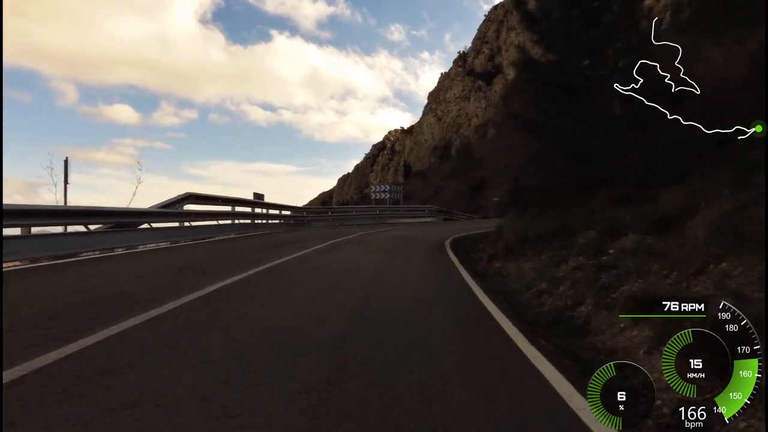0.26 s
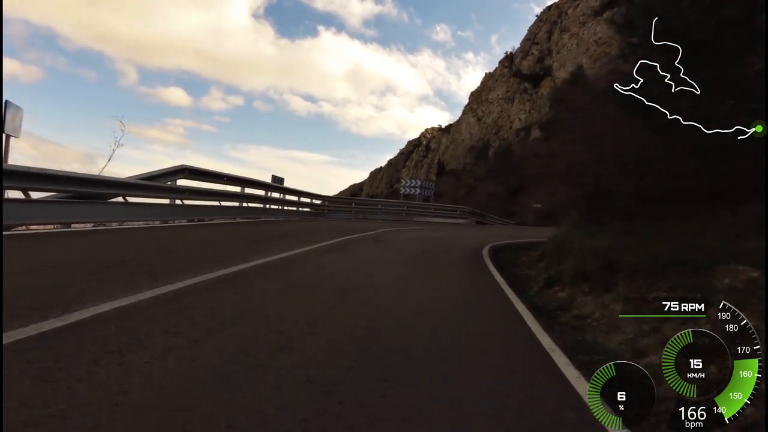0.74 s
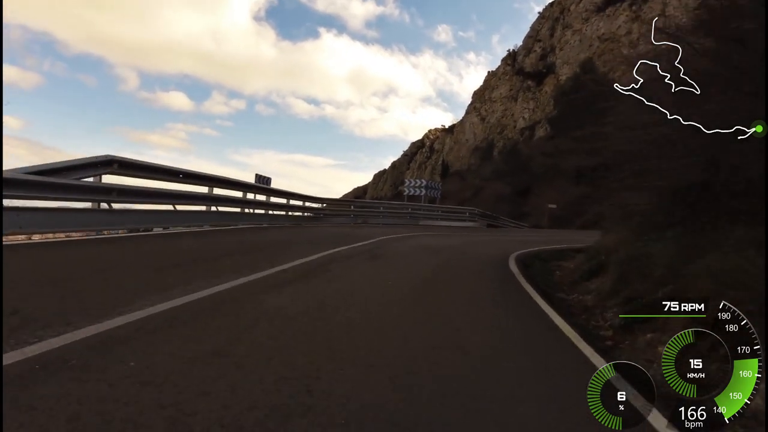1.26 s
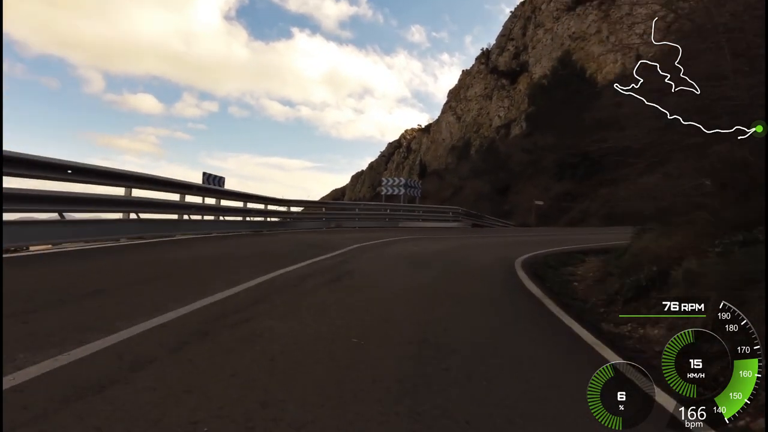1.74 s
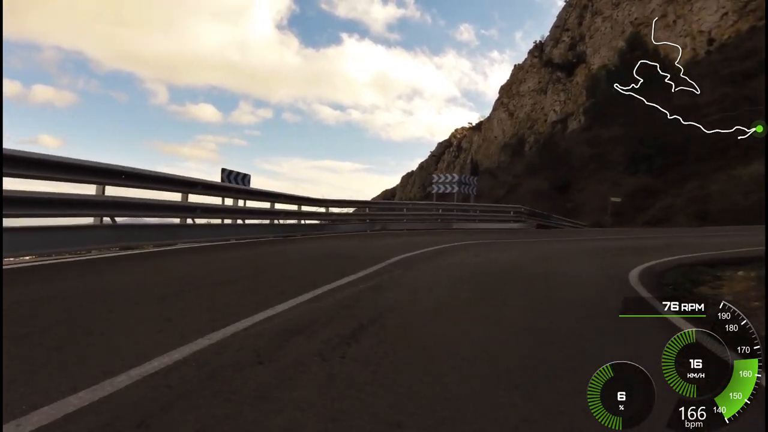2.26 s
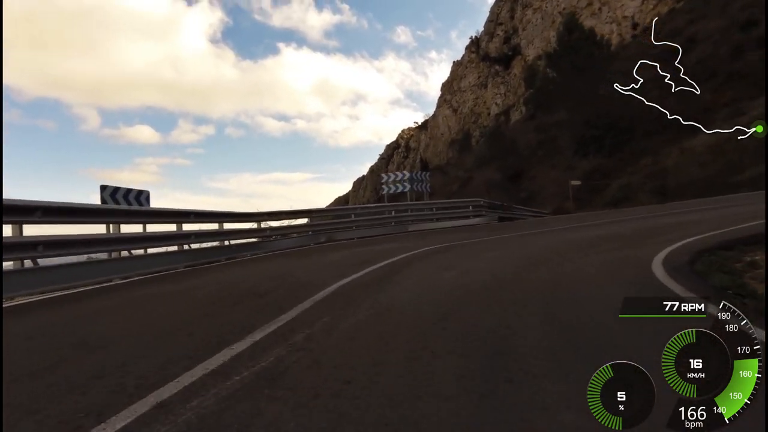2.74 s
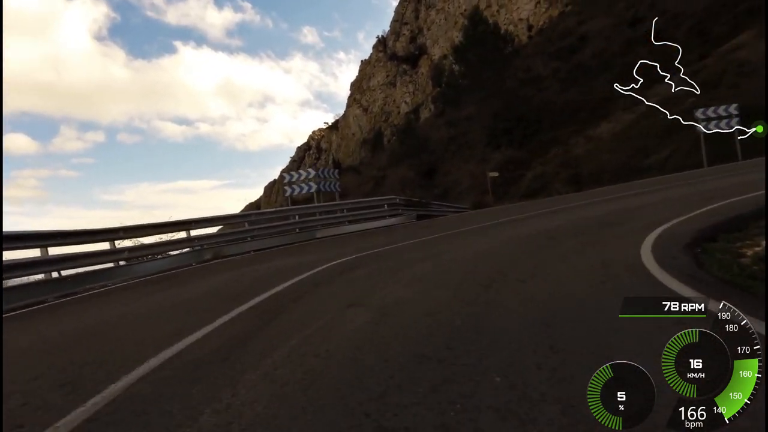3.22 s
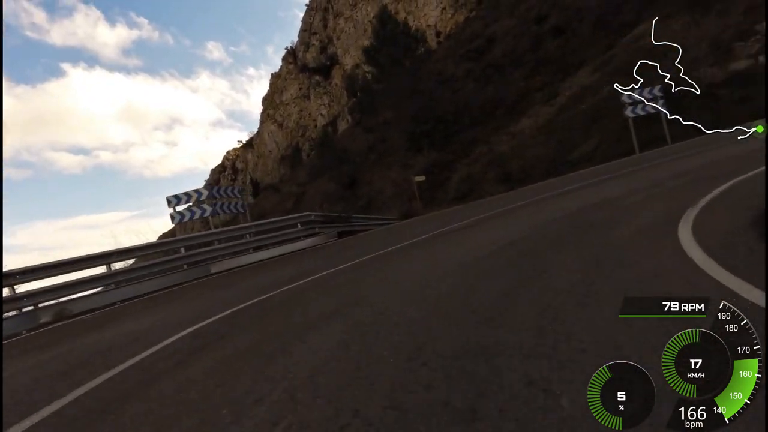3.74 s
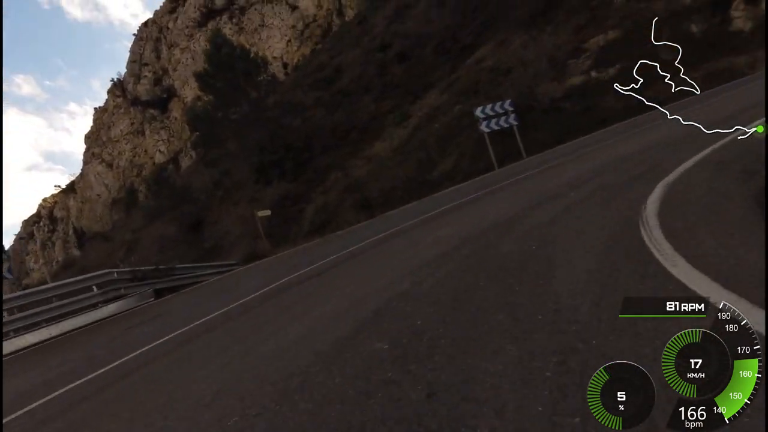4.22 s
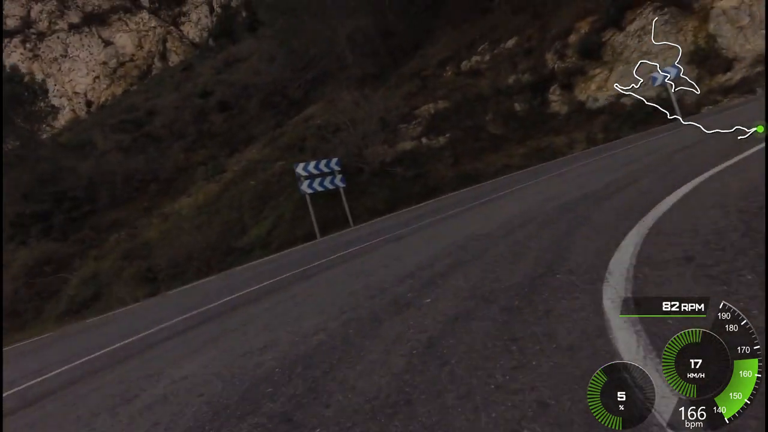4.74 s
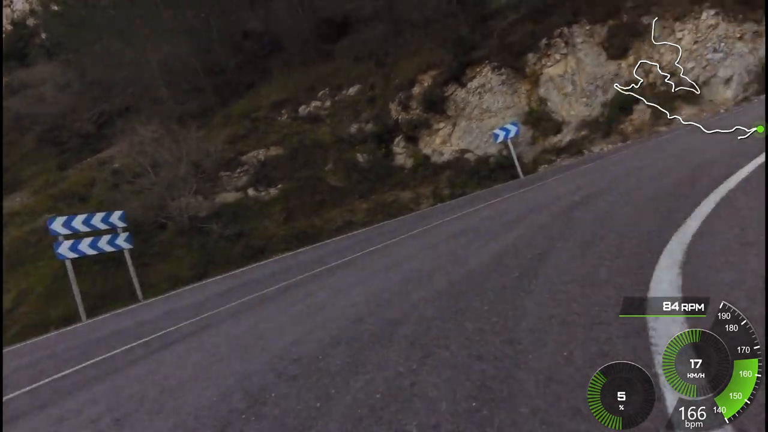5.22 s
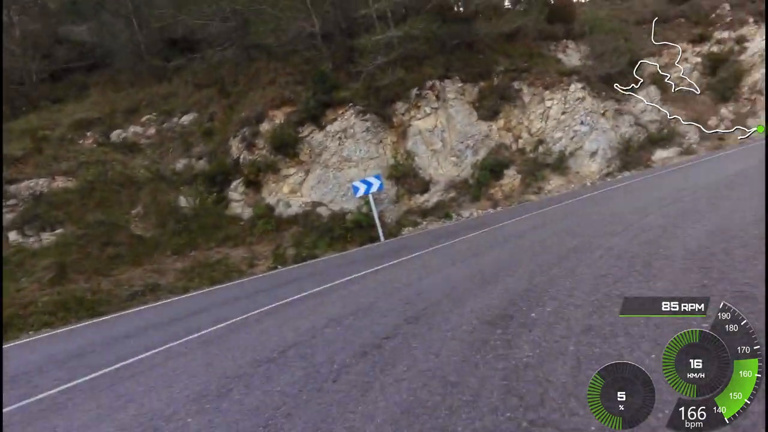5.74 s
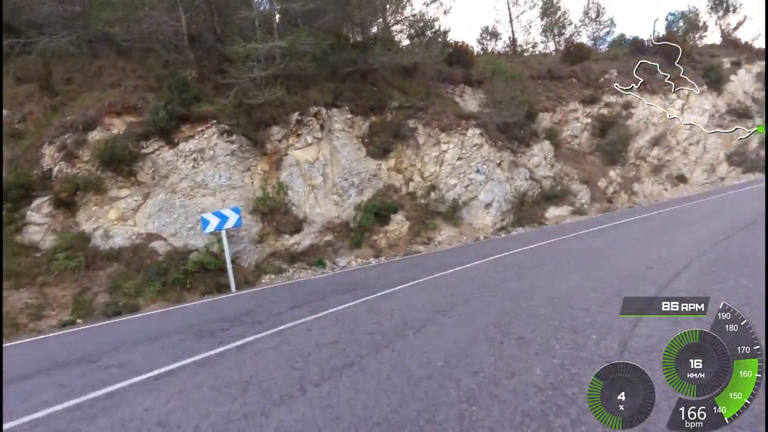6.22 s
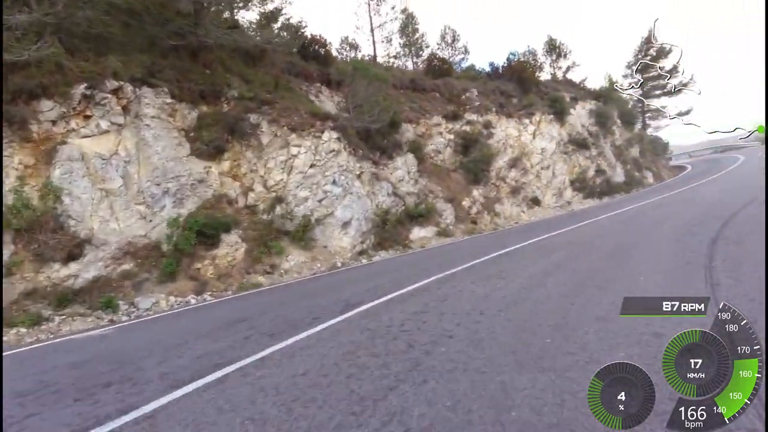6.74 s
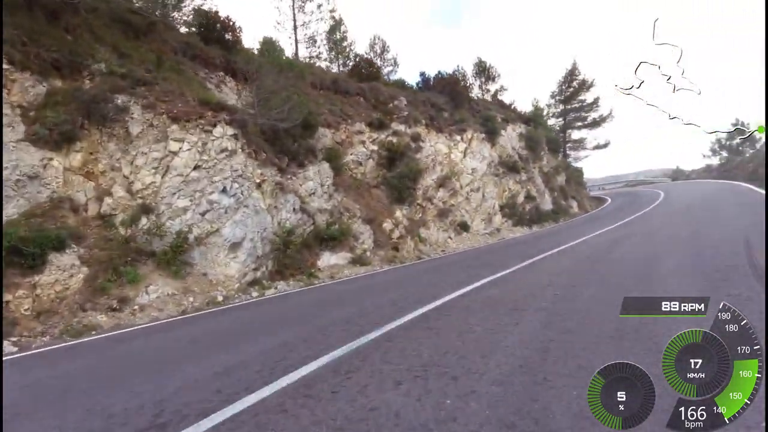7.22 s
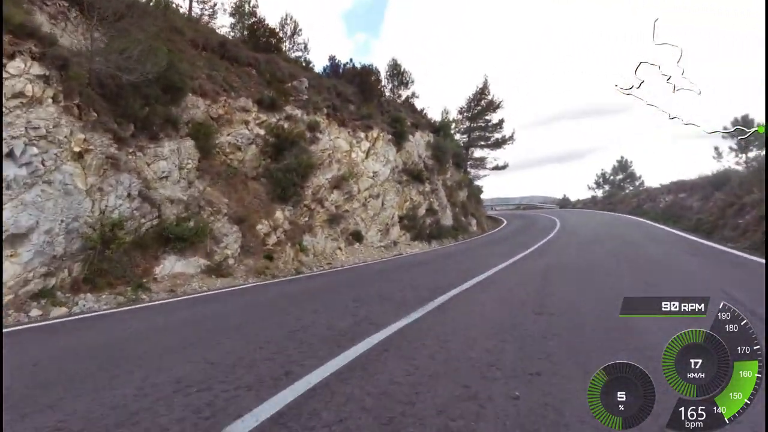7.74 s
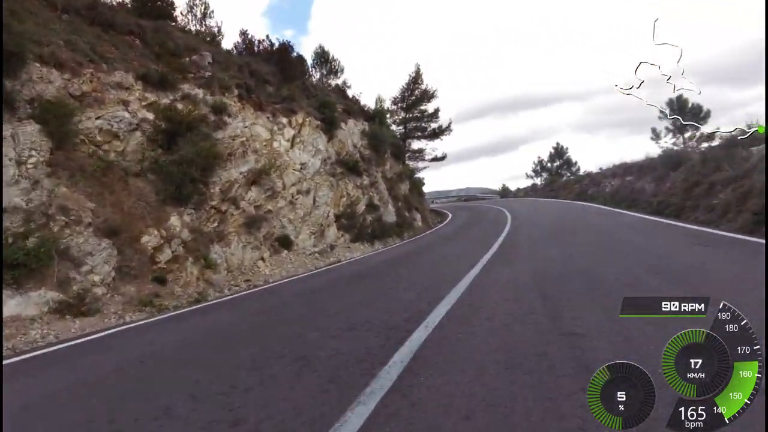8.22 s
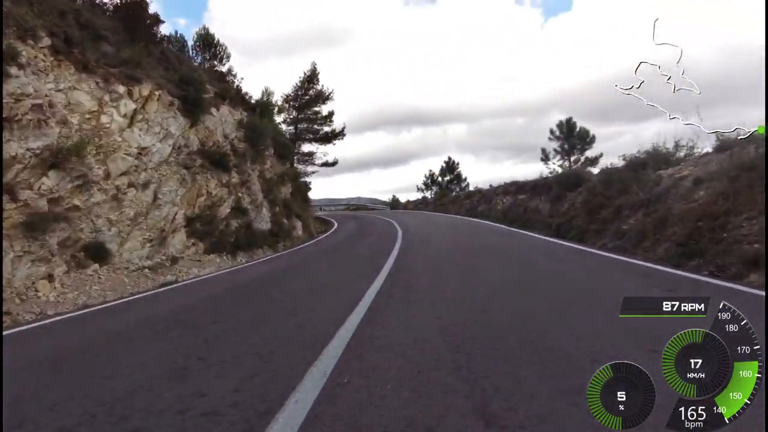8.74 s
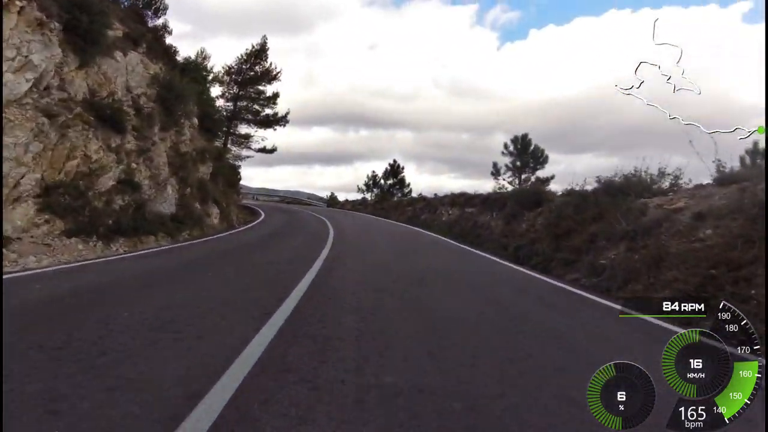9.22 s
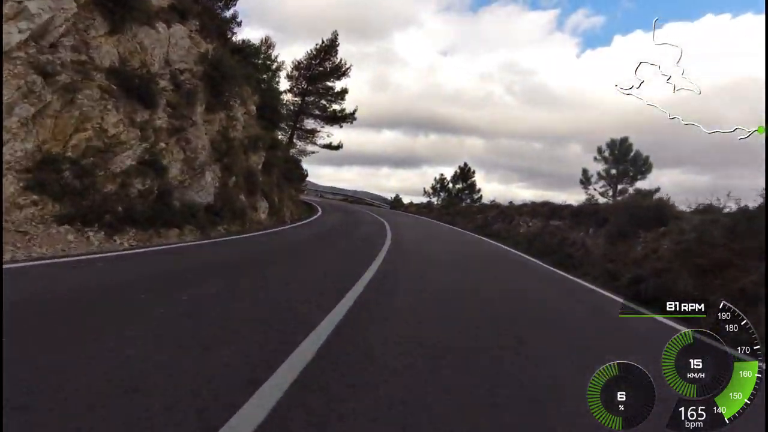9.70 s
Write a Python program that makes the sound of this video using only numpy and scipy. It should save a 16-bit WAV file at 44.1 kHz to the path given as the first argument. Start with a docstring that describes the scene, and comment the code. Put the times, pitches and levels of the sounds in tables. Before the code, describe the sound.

A camera in a plastic housing, mounted on a bicycle, rides up an asphalt road. Dense irregular hard knocks, each a short dry tick with a dull thud, tumble over a loose fluttering rattle. Low shaking, muffled rolling noise and a faint hollow hum swell around them. Later the thuds get heavier and some clip. Very close, mono, dull on top, without echo.

```python
"""Hard plastic knocks over a loose rattle, low shaking, rolling noise and a faint hum, some knocks overloading.
A camera in a plastic housing rides on a bicycle up an asphalt road. Knocks are short contacts ringing
the housing modes plus a dead thud; the rattle is many small knocks, half of them keeping a 73 Hz beat.
Shake, rolling noise and hum are filtered noise, grit is dense tiny contacts; all swell around the knocks."""
import sys
import numpy as np
from scipy import signal
from scipy.fft import rfft, irfft
from scipy.io import wavfile
from scipy.ndimage import uniform_filter1d

SR = 44100
rng = np.random.default_rng(int(sys.argv[2]) if len(sys.argv) > 2 else 0)


def bounce(signal):
    """Save signal as a 16-bit WAV file at the path given by the first command-line argument."""
    frames = np.transpose(np.atleast_2d(signal))
    limited = np.clip(frames, -1, 1)
    pcm = np.round(limited * 32767).astype(np.int16)
    wavfile.write(sys.argv[1], SR, pcm)


N = 439676

# the loudest knocks, nominal levels:
# (time [s], tick level [dB], thud level [dB], hardness as treble relative to the tick [dB])
CLEAR_KNOCKS = [(0.0387, -15.5, -14, -27), (0.0807, -13.5, -15, -21), (0.1059, -15, -3, -15),
                (0.2229, -13, -7.5, -10.5), (0.2373, -16, -7, -11), (0.349, -14, -17.5, -24),
                (0.357, -9, 0, -30), (0.4024, -9, -1, -20), (0.512, -10.5, -9.5, -26),
                (0.558, -18, -13, -32), (0.604, -12.5, -8, -33), (0.617, -11.5, -14, -25),
                (0.624, -18.5, -1.5, -24), (0.687, -22, -20, -4), (0.6993, -13.5, -8, -8.5),
                (0.7092, -11, 1.5, -13), (0.727, -13, -8, -16), (0.7525, -15, -8, -12),
                (0.769, -13, -12, -18), (0.857, -15.5, -12.5, -20), (0.8659, -17, 1.5, -6.5),
                (0.927, -19.5, -13.5, -5.5), (0.9395, -18.5, -14, -31), (1.0375, -13, -0.5, -17),
                (1.0699, -8, -27, -21), (1.101, -9, -0.5, -23), (1.1085, -20, -1.5, -18),
                (1.151, -11, -11, -15), (1.1615, -13, -1.5, -13), (1.1749, -19, -6, -8),
                (1.184, -19, -4.5, -11), (1.196, -16, -13, -20), (1.2044, -32, -1.5, 3),
                (1.229, -17, -8, -15), (1.3321, -13.5, -9, -17), (1.3457, -11, -7.5, -16.5),
                (1.4258, -15, -4.5, -31), (1.4676, -34, -5.5, -27), (1.506, -12, -5.5, -27),
                (1.5193, -6.5, -6, -9.5), (1.526, -20.5, -13.5, -1), (1.5527, -10, -7, -20),
                (1.566, -10.5, -1.5, -8), (1.579, -10.5, -12, -21), (1.5893, -10.5, -5, -28),
                (1.647, -12.5, -10, -29), (1.674, -16, -14, -28), (1.693, -12.5, -17, -27),
                (1.7073, -15.5, -10, -9.5), (1.7227, -13, -20, -29), (1.7525, -14.5, -14, -21),
                (1.7943, -12, -10, -21), (1.809, -16.5, -8.5, -16), (1.827, -11.5, -11, -22),
                (1.8805, -14.5, -10.5, -33), (1.8971, -10, -13, -38), (1.9214, -30, -1, 3),
                (1.991, -13.5, -13, -40), (2.0019, -14, -20, -27), (2.032, -12.5, -13, -15),
                (2.0454, -11.5, -6.5, -12.5), (2.0763, -18.5, -12, -35), (2.1207, -18, -13, -33),
                (2.1379, -11, -7, -30), (2.1499, -12.5, -13, -10), (2.1637, -15, -8, -27),
                (2.1875, -11, -9, -25), (2.194, -8.5, -3.5, -16), (2.214, -14, -10, -15),
                (2.2325, -12.5, -20, -25), (2.241, -16.5, -7, -22), (2.277, -14.5, -15, -16),
                (2.3381, -10.5, -9, -16), (2.3688, -14, -14, -39), (2.4575, -9, -4, -12),
                (2.4717, -10, -3, -7), (2.5, -12, -13, -30), (2.5133, -10.5, -6, -13),
                (2.5267, -11, -8, -19), (2.543, -19, -11.5, -38), (2.5549, -12.5, -17, -16),
                (2.5612, -33, -7.5, -20), (2.5852, -21, -5, -16), (2.6194, -13.5, -13, -30),
                (2.6914, -9, -8.5, -19), (2.7062, -11.5, -3.5, -5.5), (2.7321, -13, -9, -12),
                (2.7615, -5, -5, -29), (2.7734, -17.5, -3, -7), (2.8016, -9.5, -8, -31),
                (2.8086, -10.5, -9, -19), (2.8237, -12.5, -10, -9), (2.8426, -11.5, -8.0, -18),
                (2.8551, -12, -10, -19), (2.8972, -14, -6.5, -20), (2.932, -10.5, -11, -17),
                (2.9444, -12, -5.5, -13.5), (3.0409, -13.5, -8.5, -39), (3.0897, -7, -5.5, -18),
                (3.1046, -11.5, -6.5, -10), (3.118, -9.5, -6.5, -12.5), (3.135, -9, -4, -12.5),
                (3.153, -18.5, -3, -18), (3.1592, -14, -9, -18), (3.1768, -9.0, -6, -28),
                (3.1895, -14.5, -9.5, -21), (3.2042, -10, -13, -26), (3.2698, -9.5, -8.5, -16.5),
                (3.3247, -9.5, -5, -23), (3.403, -10.5, -8, -31), (3.4164, -11.5, -5, -9.5),
                (3.431, -10.5, -5, -11), (3.5066, -13, -11, -17), (3.5326, -16.5, -11.5, -39),
                (3.5398, -12, -14, -20), (3.5831, -10.5, -13, -18), (3.595, -18.5, -5.5, -11),
                (3.607, -8.5, -4.5, -14.5), (3.724, -19, -0.5, -4), (3.7289, -12.5, -8, -13),
                (3.757, -10, -1.5, -26), (3.7634, -12, -15, -12.5), (3.8246, -14.5, -9, -18),
                (3.8451, -22.5, -14, -39), (3.868, -13.5, -8, -25), (3.8902, -12.5, -7, -17),
                (3.9174, -13, -11, -14), (3.95, -17, -16, -30), (3.9565, -10.5, -16, -21),
                (3.9675, -30, -7, -11), (3.999, -13.5, -21, -15), (4.054, -15, -15, -18),
                (4.076, -15.5, -18, -18), (4.1285, -17.5, -2, -9), (4.1823, -11, -16, -15),
                (4.202, -24.5, -17, -28), (4.241, -18.5, -0.5, -6), (4.2691, -17.5, 1.5, -11),
                (4.3197, -13, -13, -11), (4.4389, -11, -7.5, -16), (4.4483, -17, -11, -17),
                (4.4565, -13.5, -17, -20), (4.4753, -22, 0.5, -13), (4.486, -10, -12, -23),
                (4.517, -12, -11, -14), (4.5634, -9.5, -5.5, -7), (4.573, -11.5, 1.5, -11),
                (4.606, -18.5, 0.0, -5), (4.6155, -30, -4, -7), (4.6342, -7.5, 0.5, -7.5),
                (4.6581, -14, -1, -9), (4.6666, -14, 0, -18), (4.6792, -15.5, -4, -2),
                (4.6893, -16, -2, -11), (4.708, -20, -12, -25), (4.772, -22, -5, -9),
                (4.7852, -12, -13, -26), (4.8056, -21, -2.5, -9), (4.876, -8.5, -3.5, -24),
                (4.895, -11, -8, -16), (4.9086, -25, -6.5, -17), (4.9455, -22, 2.5, 0.5),
                (4.9565, -36, -6.5, -20), (4.981, -12, -8, -16), (5.046, -13.5, -12, -21),
                (5.0577, -26, -1, 3), (5.0718, -15, -6.5, -10), (5.085, -27, -1, 0), (5.1039, -42, -9, -25),
                (5.1357, -15, -21, -16.5), (5.205, -13, -13, -28), (5.2176, -10, -18, -13),
                (5.2461, -12.5, 0.5, -10), (5.27, -21, -2, -11), (5.3099, -15.5, 0.5, -7.5),
                (5.3176, -22, -1, -9), (5.325, -16, -4, -15), (5.3311, -13.5, -2, -12),
                (5.3458, -12.5, -7.5, -15), (5.3557, -17.5, -7.5, -12), (5.3829, -14.5, -2, -4.5),
                (5.4241, -18.5, 0, -5.5), (5.435, -32, -7.5, -17), (5.4675, -16, 0, -7),
                (5.479, -19, -9, -17), (5.497, -27, -5.5, -8), (5.5102, -28, -3.5, -8),
                (5.525, -14, -9.5, -11.5), (5.5624, -23, -6, -6), (5.5948, -38, -5.5, -29),
                (5.628, -29, -0.5, -4), (5.6489, -18.5, -4.5, -14), (5.6722, -18, -0.5, -10),
                (5.6886, -29, -6, -9), (5.713, -40, -6, -28), (5.7536, -15.5, -2.5, -10),
                (5.7815, -28, -5.5, -14), (5.8369, -21, -9.5, -18), (5.8829, -13.5, -21, -25),
                (5.8955, -12.5, -11, -13), (5.9087, -12.5, -14, -16), (5.9182, -16.5, -0.5, -19),
                (5.9301, -10.5, -8.5, -12), (5.9466, -28, 0, -1), (5.9562, -24, -2.5, -15),
                (5.966, -16.5, -7, -16), (6.023, -27, -2.5, -13), (6.0472, -20, -3, -13),
                (6.0761, -14, 0.5, -9.5), (6.0857, -21, -0.5, 1), (6.0934, -18, -12, -9),
                (6.1022, -27, -3.5, -9), (6.1304, -22, -3.5, -8.5), (6.153, -31, -9, -16),
                (6.217, -14.5, -0.5, -4), (6.2287, -28, -6, -34), (6.2623, -10.5, -7, -11),
                (6.2782, -14, -19, -18), (6.2936, -29, 1.5, 8), (6.3373, -20, 1.5, -3),
                (6.3613, -16, -4, -9), (6.38, -23, -3, -5), (6.4184, -17.5, -2.5, -25),
                (6.443, -17, -4.5, -8.5), (6.4542, -25, -3, -5), (6.465, -18, -1, -12),
                (6.4744, -21, -4, -7), (6.5506, -29, -5.5, -4), (6.573, -24.5, 0.5, -6),
                (6.583, -31, -8, -26), (6.5984, -28, -4, -10), (6.692, -12.5, -1, -16), (6.754, -35, -2, 4),
                (6.7635, -32, -2.5, -5), (6.773, -14.5, -25, -12), (6.8059, -12.5, -12, -37),
                (6.827, -17, -14, -32), (6.8386, -14.5, -18, -38), (6.9058, -32.0, -6, -10),
                (6.9244, -11.5, -11.5, -29), (6.9548, -13, -16, -24), (7.001, -8.5, -13, -16),
                (7.0107, -8.5, 0, -6.5), (7.0257, -15, 0.5, -3.5), (7.0352, -10, -3.5, -27),
                (7.0447, -25, -5, -6), (7.173, -16.5, -8.5, -36), (7.188, -14, -9.5, -41),
                (7.219, -7.5, -5.5, -28), (7.2663, -34, -2.5, -27), (7.2902, -11.5, 0.5, -25),
                (7.3029, -29, -6, -29), (7.3267, -27, -4, -7), (7.357, -16, -7, -19),
                (7.3918, -18.5, -18, -38), (7.4736, -15, -13, -33), (7.5053, -12.5, -2.5, -10),
                (7.513, -16.5, -9, -29), (7.524, -10.5, -7.5, -27), (7.5468, -9, 2.5, -27),
                (7.5601, -15, -2, -18), (7.57, -18, -0.5, -11), (7.601, -13.5, 3.5, -16),
                (7.6081, -15.5, -6.5, -17), (7.6481, -13, 1.5, -1.5), (7.6673, -22, 1, -11),
                (7.675, -11.5, -13, -20), (7.6818, -29, -1, -5), (7.6979, -13, -5.0, -1.5),
                (7.7545, -19, -26, -42), (7.8414, -10, -6.5, -24), (7.855, -10.5, -12, -23),
                (7.8774, -22, 1.5, -14), (7.887, -12, -17, -29), (7.893, -26, 1.5, -4),
                (7.9167, -21, 0, -4), (7.9374, -35, -6.5, -7), (7.9519, -7, 1.5, -6),
                (8.0275, -16, -15, -43), (8.063, -13, 0.5, -12.5), (8.074, -12.5, -11, -34),
                (8.1293, -14.5, 0.5, -10.5), (8.141, -18, -8, -19), (8.1471, -21, 2, -10),
                (8.1636, -16, -15, -20), (8.19, -31, -7, -30), (8.2104, -35, -6, -20),
                (8.2312, -28, -2, -5), (8.2701, -14.5, 1.5, -12.5), (8.283, -22, -10, -24),
                (8.3657, -11.5, 3.5, -9), (8.3762, -28, -3.5, 3), (8.388, -17, -18, -23),
                (8.3977, -26.5, 1, -2), (8.409, -30, -6.5, -17), (8.4608, -18.5, -13, -7),
                (8.4883, -14, -22, -34), (8.5015, -12.5, -18, -23), (8.5445, -19.5, 0.5, -3.5),
                (8.558, -18, 2.5, -7), (8.581, -14.5, -12, -32), (8.6062, -20, 0, 3.5),
                (8.6137, -16, -1.5, -4), (8.6331, -25, -14, -4), (8.6573, -18, -1.5, -11),
                (8.751, -32.0, -5, -27), (8.7859, -15, -7.5, -30), (8.796, -24, -0.5, -6),
                (8.8292, -13, -25, -35), (8.8958, -22, -2, -11), (8.936, -21.0, -2.5, -24),
                (8.9683, -11, -1, -37), (8.9803, -10, -6, -23), (8.9983, -22, -0.5, -18),
                (9.0393, -30, -1.5, -1), (9.1045, -10, -16, -30), (9.1369, -22.5, -3, -5),
                (9.1768, -16, -4.5, -42), (9.2254, -12.5, -13.5, -34), (9.2336, -14.5, 0.5, -23),
                (9.244, -11, -2.5, -31), (9.283, -17, -11, -44), (9.3267, -10, -18, -25),
                (9.3368, -15.5, -6, -13), (9.35, -26.5, 0, 1), (9.3634, -9.5, -2.5, -27),
                (9.394, -14, -2.5, -14), (9.407, -23, -2, -19), (9.4884, -27, -6, -40),
                (9.505, -22.5, -0.5, 2), (9.5233, -12, -14, -20), (9.5364, -15.5, -21, -33),
                (9.6061, -18.5, -12, -31), (9.6136, -24.5, 2, 3.5), (9.6923, -14.5, -8.5, -30),
                (9.757, -10.5, -4.5, -30), (9.7708, -14.5, -7.5, -9.5), (9.8537, -11.5, -13, -11),
                (9.8952, -10.5, -16, -21), (9.9087, -17, -14, -3.5), (9.9177, -17, 1.5, -6),
                (9.949, -8.5, 3, -12.5)]
# modes of the plastic housing: (frequency [Hz], relative level [dB], T60 [s])
HOUSING_MODES = [(212, 3, 0.014), (525, -5.5, 0.056), (772, -11.5, 0.021), (1140, 11.5, 0.0054),
                 (1240, 5.5, 0.016), (1620, 3.5, 0.005), (2080, -5, 0.0073), (3030, -12.5, 0.0038),
                 (3920, -10, 0.003), (4420, -15, 0.007), (5350, -21, 0.0067)]
TICK, THUD = 1, 2  # columns of CLEAR_KNOCKS
SHAKE, CHATTER, HUM = 1, 2, 3  # columns of the road table


def gain_of(db):
    """Amplitude factor of a level in dB."""
    return 10 ** (np.asarray(db) / 20)


def unit_rms(x):
    """Scales a signal to an RMS of one."""
    return x / np.sqrt(np.mean(x ** 2) + 1e-20)


def lowpass(x, hz, order=2):
    """Butterworth low-pass."""
    return signal.lfilter(*signal.butter(order, hz, fs=SR), x)


def highpass(x, hz, order=2):
    """Butterworth high-pass."""
    return signal.lfilter(*signal.butter(order, hz, "high", fs=SR), x)


def resonance(x, hz, width_hz):
    """One resonance of the given bandwidth."""
    return signal.lfilter(*signal.iirpeak(hz, hz / width_hz, SR), x)


def scatter(s, values, offset=0):
    """Sums values into a track at times s, plus offsets in samples."""
    at = (s * SR).astype(int) + offset
    inside = (at >= 0) & (at < N)
    return np.bincount(at[inside], values[inside], N)


def road(column):
    """One nominal level of the road table [dB], interpolated to every sample."""
    # (time [s], road shake between knocks [dB], loose chatter [dB], lid hum [dB])
    road_levels = [(0.0, -21, -38.5, -37.5), (0.44, -23, -40, -32.5), (0.72, -16.5, -38, -39),
                   (0.89, -25, -49.5, -40), (1.3, -24, -44, -37), (2.05, -25.5, -42.5, -35.5),
                   (2.52, -23, -50.5, -34.5), (2.64, -24, -48.5, -31), (4.55, -22, -39.5, -39),
                   (5.02, -26, -43.5, -47.5), (5.41, -24.5, -46.5, -51), (5.69, -24.5, -44.5, -63),
                   (6.8, -26.5, -40.5, -47), (7.22, -24, -46.5, -38), (9.05, -25.5, -46, -46.5),
                   (9.97, -24, -45.5, -37)]
    rows = np.transpose(road_levels)
    return np.interp(np.arange(N) / SR, rows[0], rows[column])


def stir(column, hold_s):
    """How shaken the camera is around the clear knocks [dB]: knock powers spread in time."""
    build_up = 0.77  # shaking gathers before a blow in this share of the time it takes to die away
    rows = np.transpose(CLEAR_KNOCKS)
    t = np.arange(-SR // 4, SR // 4 + 1) / SR
    width_s = hold_s * np.where(t < 0, build_up, 1)
    bell = np.exp(-.5 * (t / width_s) ** 2)
    powers = scatter(rows[0], gain_of(2 * rows[column]))
    return 10 * np.log10(signal.oaconvolve(powers, bell, "same") + 1e-5)


def ring(contact_s, dip_db, above_hz):
    """Pressure dip of one contact and the housing modes it wakes above a pitch, at unit peak."""
    t = np.arange(2048) / SR
    out = np.zeros(len(t))
    for hz, db, t60_s in HOUSING_MODES:
        out -= gain_of(db - 60 * t / t60_s) * np.sin(2 * np.pi * hz * t)
    out[:25] -= gain_of(dip_db) * np.hanning(25)
    # a longer contact wakes less treble
    out = np.convolve(out, signal.windows.gaussian(101, contact_s * SR))
    out = highpass(out, above_hz)
    return out / abs(out).max()


def lid_hum():
    """The lid of the housing hums at its hollow mode while the road stirs it."""
    hz, width_hz = HOUSING_MODES[2][0], 50
    hum = resonance(rng.standard_normal(N), hz, width_hz)
    hum = resonance(hum, hz, 3 * width_hz)
    level_db = road(HUM) + 2.0 + 0.19 * (stir(TICK, 0.037) + 7.5)
    return gain_of(level_db) * unit_rms(hum)


def tyre():
    """Rolling noise carried through the frame, swelling where the asphalt is rough."""
    # colour of the rolling noise: (frequency [Hz], relative level [dB])
    tyre_colour = [(25, -45.5), (45, -17.5), (100, -6.5), (230, -12.5), (420, -11.5), (770, -6.5),
                   (1050, -11), (1280, -25.5), (1480, -44), (2300, -38), (3200, -58), (6000, -75.5),
                   (9000, -125), (16000, -140)]
    hz, db = np.transpose(tyre_colour)
    colour_db = np.interp(np.log(np.fft.rfftfreq(N, 1 / SR) + 1), np.log(hz), db)
    hiss = unit_rms(irfft(rfft(rng.standard_normal(N)) * gain_of(colour_db), N))
    flicker = unit_rms(uniform_filter1d(rng.standard_normal(N), size=500))
    rough_db = 1.21 * (stir(TICK, 0.0082) + 15)
    level_db = .5 * (road(SHAKE) + road(CHATTER)) - 3.0 + rough_db + 4.5 * flicker
    return gain_of(level_db) * hiss


def mount():
    """Road grain shakes the frame and bracket at their broad resonances, more in rough patches."""
    # resonances of frame and bracket: (frequency [Hz], width [Hz], relative level [dB])
    mount_modes = [(66.9, 10, 9.5), (143.7, 9.6, 4.5), (231.2, 4.6, -1), (372, 190, -3)]
    grain, shake = rng.standard_normal(N), np.zeros(N)
    for hz, width_hz, db in mount_modes:
        shake += gain_of(db) * unit_rms(resonance(grain, hz, width_hz))
    shake = lowpass(highpass(shake, 62), 500)
    level_db = road(SHAKE) + 0.34 * (stir(THUD, 0.011) + 12) - 3.0
    return gain_of(level_db) * unit_rms(shake)


def grit():
    """Fine crackle of the camera scraping its housing, louder while the mount is shaken."""
    grains_per_s = 900
    sizes = gain_of(4.0 * np.minimum(rng.exponential(1, N), 4))
    grains = (rng.random(N) < grains_per_s / SR) * sizes
    crackle = signal.oaconvolve(grains, ring(.00003, dip_db=-6.0, above_hz=1300))[:N]
    level_db = road(CHATTER) - 12.0 + 0.7 * (stir(TICK, 0.02) + 12)
    return gain_of(level_db) * unit_rms(crackle)


def chatter(per_swing, jitter_s):
    """Small blows of chance size, timed by the swing of the mount, livelier around the clear knocks."""
    rattle_hz = 73.26
    s = np.arange(0, N / SR - .02, 1 / (rattle_hz * per_swing))
    when, size, weight = np.clip(rng.standard_normal((len(s), 3)).T, -2.5, 1.5)
    clear = np.transpose(CLEAR_KNOCKS)[0]

    # the rattle keeps time after a knock
    after = np.clip(np.searchsorted(clear, s), 1, len(clear) - 1)
    last = clear[after - 1]
    locked = last + np.ceil((s - last) * rattle_hz) / rattle_hz
    on_beat = (np.arange(len(s)) % per_swing == 0) & (locked < clear[after] - .5 / rattle_hz)
    s = np.where(on_beat, locked + .0013 * when, s + jitter_s * when)
    s = np.clip(s, 0, (N - 1) / SR)

    at = (s * SR).astype(int)
    spread_db = 5
    steady_db = road(CHATTER)[at] + 14.0 + 0.41 * (stir(TICK, 0.038)[at] + 12.0)
    tick_db = np.maximum(steady_db, stir(TICK, 0.009)[at] - 11)
    tick_db += spread_db * size + np.where(on_beat, 1.5, -5.0)
    upcoming = clear[np.clip(np.searchsorted(clear, s), 0, len(clear) - 1)]
    tick_db -= 9.6 * (upcoming - s < .007)  # in flight before a knock
    steady_db = road(SHAKE)[at] + 3.34 + 0.25 * (stir(THUD, 0.04)[at] + 6.3)
    thud_db = np.maximum(steady_db, stir(THUD, 0.014)[at] - 14) + spread_db * weight
    hard_db = -16.5 + 0.55 * (tick_db + 25.0)  # light blows are duller
    return knocks(s, tick_db, thud_db, hard_db)


def knocks(s, tick_db, thud_db, hard_db):
    """A blow is one firm contact and a scrape of lesser ones that ring the housing, riding on a dead thud."""
    chance = rng.standard_normal((len(s), 6, 3))
    lesser = np.arange(6)[None] > 0
    lag_s = lesser * (.002 * abs(chance[..., 0]) + .0004) - .0011
    size = gain_of(lesser[..., None] * (4.0 * chance[..., 1:] - [16.0, 3.0]))
    size /= np.linalg.norm(size, axis=1, keepdims=True)
    contact_times = s[:, None] + lag_s
    soft = scatter(contact_times, gain_of(tick_db + 6.0)[:, None] * size[..., 0])
    hard = scatter(contact_times, gain_of(tick_db + hard_db + 8.5)[:, None] * size[..., 1])
    out = signal.oaconvolve(soft, ring(0.00013, dip_db=16.0, above_hz=65))[:N]
    out += signal.oaconvolve(hard, ring(.00004, dip_db=1.5, above_hz=1345))[:N]

    # each blow also wakes the highest modes, by a chance amount
    bright_db = tick_db + .5 * hard_db - 23.0 + 4.5 * np.clip(chance[:, 0, 1], -3, 1.5)
    bright = scatter(s + lag_s[:, 1], gain_of(bright_db))
    out += signal.oaconvolve(bright, ring(.00002, dip_db=-32, above_hz=2900))[:N]

    # the swing slows as it goes: a short dip, a broad hump, a shallow trough
    step = np.arange(700)
    cycles = step / SR * 230 * np.exp(0.27 * np.clip(chance[:, :1, 0], -2, 2))
    onset = np.sin(np.pi / 2 * np.minimum(cycles / 0.14, 1)) ** 2
    thud = -np.sin(2 * np.pi * cycles ** 0.63) * onset
    thud *= np.exp(-(cycles / 0.71) ** 2) * np.cos(np.pi / 2 * step / len(step)) ** 2

    # the stronger the tick against the thud, the later the thud, as a rebound
    rebound_s = 0.002464 * np.clip((tick_db - thud_db + 9.0) / 4.0, 0, 1)
    thud_times = (s + rebound_s)[:, None] - .0018
    thuds = scatter(thud_times, gain_of(thud_db + 0.5)[:, None] * thud, step)
    thuds = lowpass(np.roll(thuds, -9), 1100)  # a thud has no edge
    return out + highpass(thuds, 74)  # the housing vents slow pressure


def scene():
    """Sum of the background layers, the loose rattle and the clear knocks, in one channel."""
    background = lid_hum() + tyre() + mount() + grit()
    loose = chatter(per_swing=2, jitter_s=0.0035)
    return (background + loose + knocks(*np.transpose(CLEAR_KNOCKS)))[None]


def record(dry):
    """The treble falls off steeply above 6 kHz, deep bass is cut, and the input flattens the tallest swings."""
    # where the housing wall passes least sound: (frequency [Hz], width [Hz])
    wall_notches = [(1440, 110), (1915, 39)]
    wall_share = 0.43  # how much of the sound takes the path through the wall
    x = lowpass(dry, 6000, order=4)
    for hz, width_hz in wall_notches:
        through_wall = signal.lfilter(*signal.iirnotch(hz, hz / width_hz, SR), x)
        x = x + wall_share * (through_wall - x)
    x = highpass(x, 48)
    # upward swings stop more abruptly
    top, knee = np.where(x > 0, .705, .68), np.where(x > 0, 60, 25)
    x = x / (1 + abs(x / top) ** knee) ** (1 / knee)
    x = highpass(x, 5, order=1)  # the coupling after the input lets flat tops sag
    x = x + gain_of(-98) * rng.standard_normal(x.shape)  # input hiss
    band_limit = signal.firwin(511, 15800, window=("kaiser", 9), fs=SR)  # cutoff in Hz
    return signal.oaconvolve(x, band_limit[None], "same")


dry = scene()
out = record(dry)
bounce(out)
```